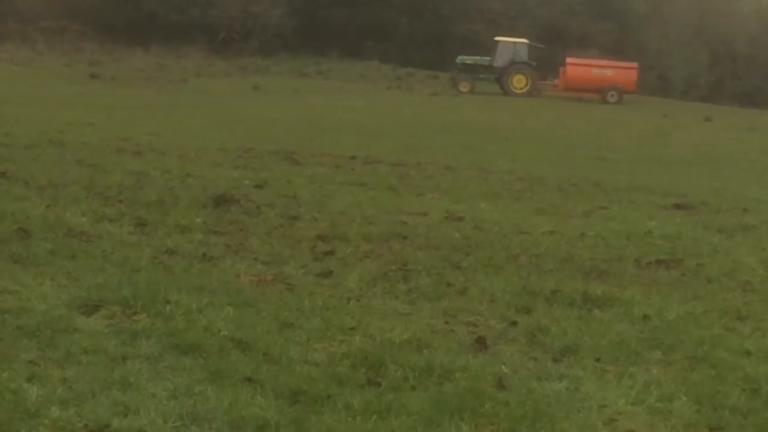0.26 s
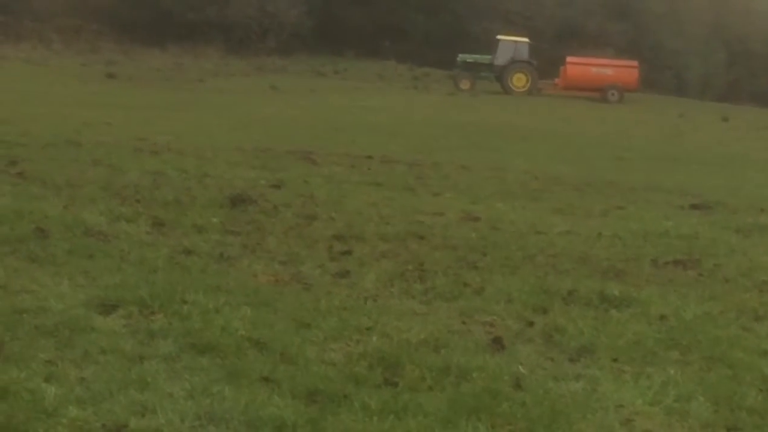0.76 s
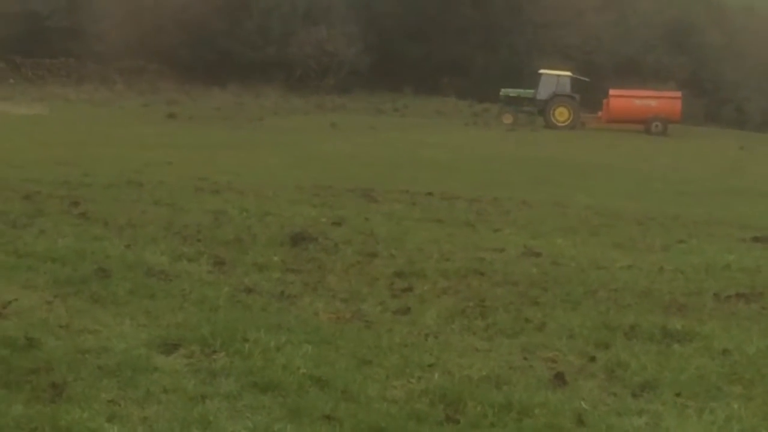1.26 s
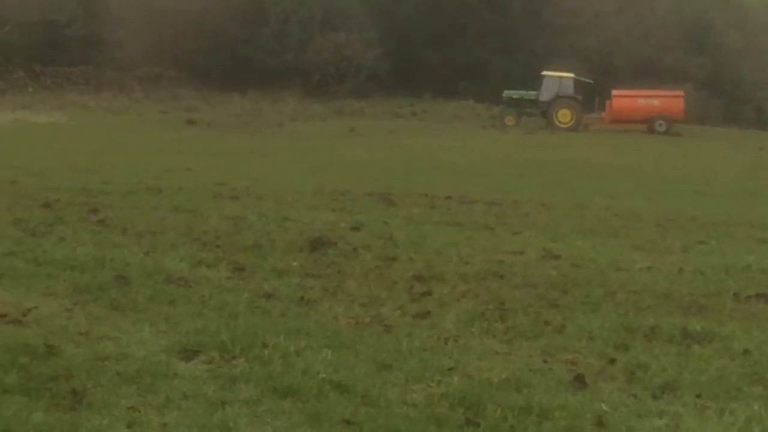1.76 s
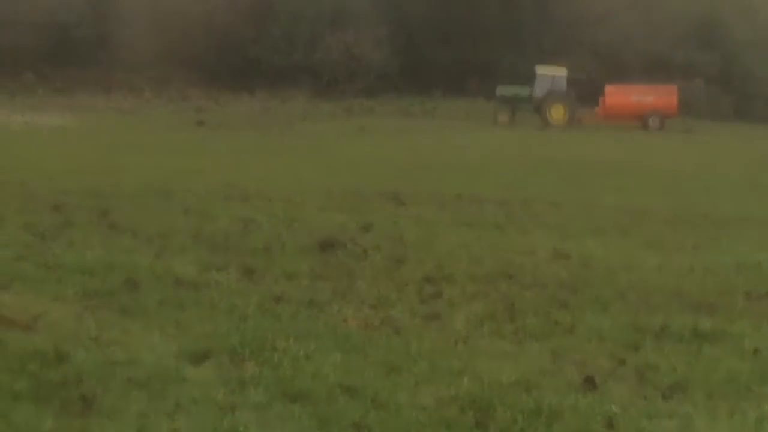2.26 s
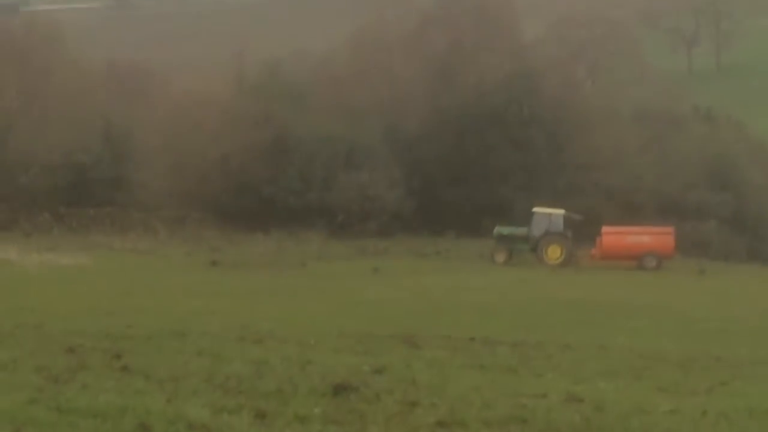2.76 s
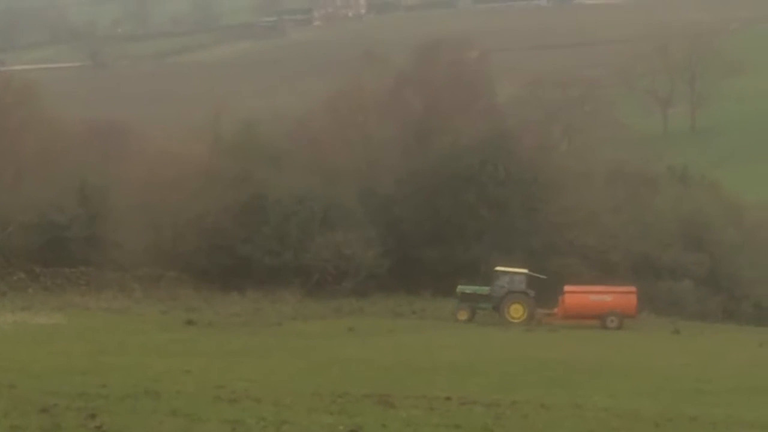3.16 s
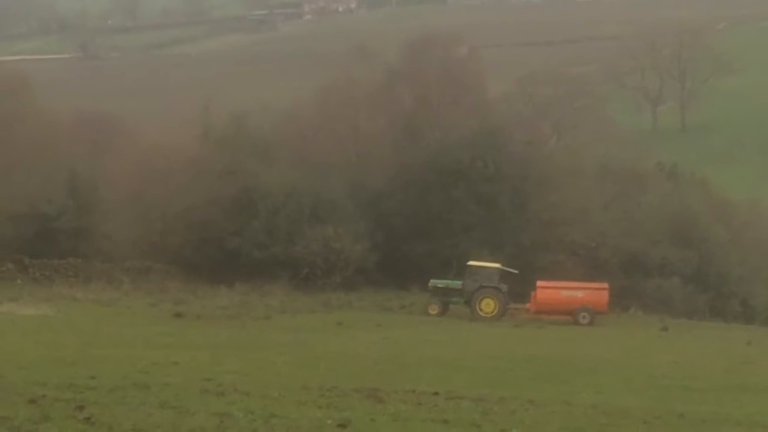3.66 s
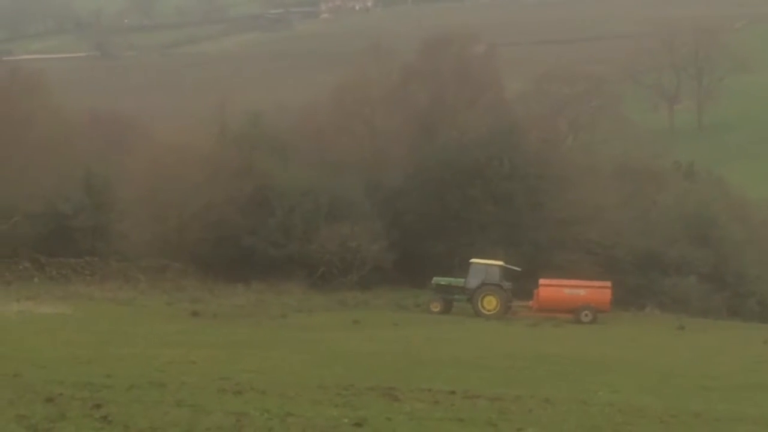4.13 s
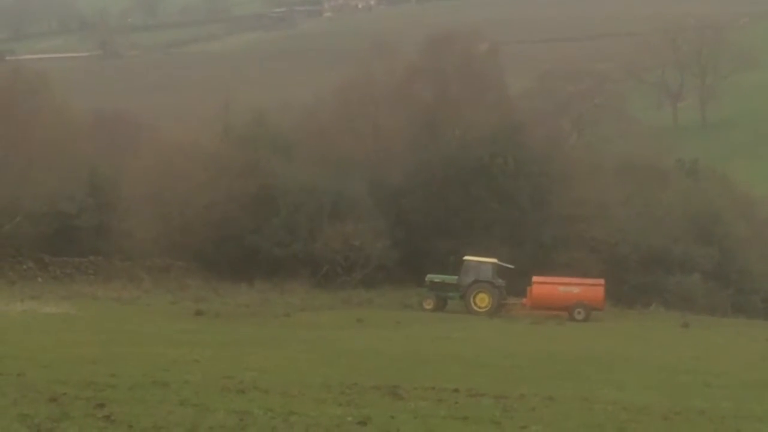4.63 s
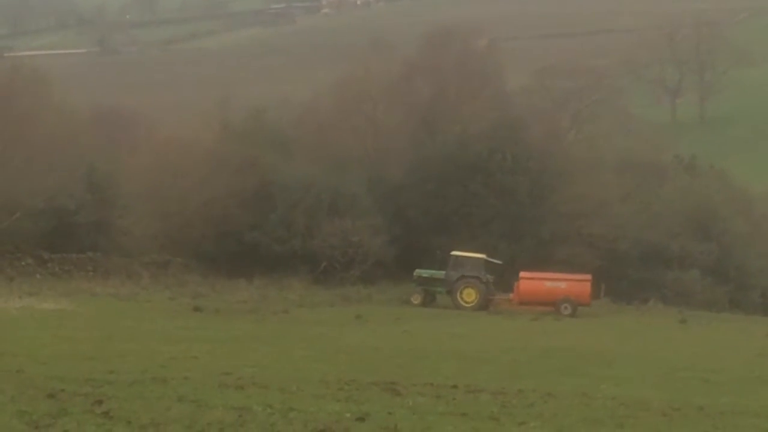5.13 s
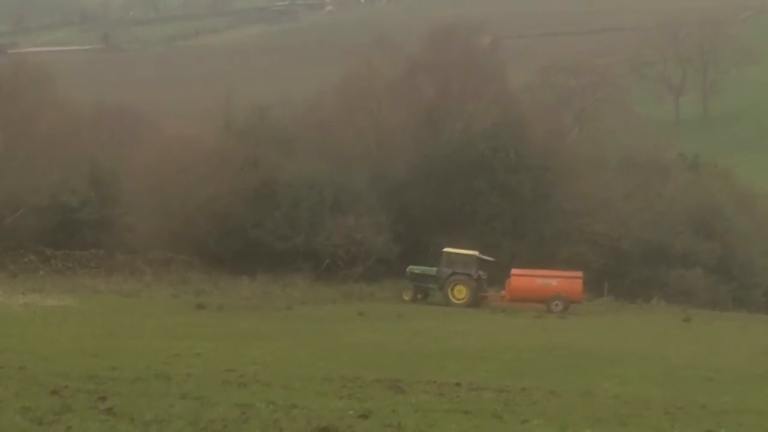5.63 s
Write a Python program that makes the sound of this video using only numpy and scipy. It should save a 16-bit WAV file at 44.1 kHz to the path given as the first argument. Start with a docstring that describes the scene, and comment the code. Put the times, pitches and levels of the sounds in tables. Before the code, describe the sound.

Across an open field, a tractor engine drones under load with a low boom and a diesel rattle. A pulsing hiss and occasional light ticks come from the spreader it is towing. After about two thirds of the time the driver lifts off, the pitch falls and the hiss fades back. A quick cluster of metallic clanks follows from the hitch, over a softer, knocking idle.

```python
"""A booming, knocking four-cylinder diesel tractor tows a muck spreader across a far hillside.
Near 4 s the driver lifts off, the revs sink, then the hitch clanks. The exhaust booms at the firing
rate, combustion knocks in the block, injectors tick, the spreader hums and hisses, chain and stones
hit its drum. The spectra are weak at 400-800 Hz, which soft ground swallows on the way."""
import sys
import numpy as np
from scipy import signal
from scipy.fft import rfft, irfft, next_fast_len
from scipy.io import wavfile
from scipy.ndimage import uniform_filter1d, map_coordinates

SR = 44100
rng = np.random.default_rng(int(sys.argv[2]) if len(sys.argv) > 2 else 0)


def generate_wav(sig):
    """Save sig (samples, or channels by samples) to the path in sys.argv[1] as 16-bit PCM at SR."""
    pcm = np.round(np.clip(np.atleast_2d(sig).T, -1, 1) * 32767).astype(np.int16)
    wavfile.write(sys.argv[1], SR, pcm)


N = 259749

# cylinders in firing order: knock/dB, injector/dB
CYLINDER_DB = [(1.9, -9), (2.4, -9), (-1, -12), (1.2, -6.5)]


def exhaust(firings, load):
    """Boom and overtones locked to the crank; uneven cylinders give the quarter orders."""
    # firing tone: t/s, level/dB
    boom_db = [(0, -37), (.64, -36.2), (1.3, -39), (2.2, -41), (3.5, -39.5), (3.9, -38.5), (3.99, -41),
               (4.07, -66), (4.3, -56), (4.7, -52), (5.89, -52)]
    # overtones: f/firing rate
    orders = [1.25, 1.75, 2, 2.25, 2.5, 2.75, 3, 3.25, 3.75, 4, 4.25, 4.75]
    # level per order: full load/dB, half load/dB, no load/dB
    orders_db = [(-61, -56, -79), (-62, -65, -67), (-50.5, -50, -50.5), (-63, -54, -56.5),
                 (-54.5, -80, -69), (-47, -67, -73), (-48, -43.5, -52.5), (-57, -71, -94),
                 (-90, -56, -57.5), (-57.5, -50, -60.5), (-60, -82, -57.5), (-65, -54, -73)]
    lag_turns = 0.22
    tones = amp(curves(boom_db)[0] + 0.18 * wobble(5.94)) * np.cos(2 * np.pi * firings)
    for order, db in zip(orders, orders_db):
        waver_db = 1.4 * wobble(6) + 0.9 * wobble(2.2)
        turns = order * firings + lag_turns + 0.073 * wobble(2.495)
        tones += amp(by_load(load, db[::-1]) + waver_db) * np.cos(2 * np.pi * turns)
    return np.sqrt(2) * tones


def knock(firings, load):
    """Each combustion shakes the block: a noisy rattle, plus a repeatable ring under load."""
    # rattle under load: f/Hz, density/dB
    loaded_spectrum = [(250, -39), (420, -19.5), (475, -20), (819, -14), (1010, -4.5), (1120, -7.5),
                       (1370, 1.5), (1800, -1.5), (2130, 0.5), (2780, -3), (3080, -10.5), (3800, -8),
                       (6000, -26), (7800, -46), (13200, -120)]
    # rattle off load: f/Hz, density/dB
    idle_spectrum = [(250, -46), (420, -30), (475, -15.5), (733, -13), (1140, -2), (1260, 0.5), (1910, 2),
                     (2280, -2.5), (3760, -6), (5430, -16), (6000, -43), (7800, -56), (13200, -120)]
    # block modes: f/Hz, width/Hz, level/dB
    modes = [(1035, 99, -1), (1301, 158, 5.5), (1394, 71, 6), (2115, 123, 3.5)]
    cylinder_db = [c[0] for c in CYLINDER_DB]
    fuelled = np.clip(2 * load - 1, 0, 1)
    steady = 0.42 + 0.62 * (1 - fuelled)  # bursts sink into this on low fuel
    shake = steady + bursts(firings, cylinder_db, start=0.075, rise=0.29, scatter_db=0.8)
    shake *= patchy(0.56)
    blend = np.sqrt(fuelled)
    rattle = blend * coloured(shake, loaded_spectrum) + (1 - blend) * coloured(shake, idle_spectrum)
    onsets = np.flatnonzero(np.diff(np.floor(firings - 0.2))) + 1
    blow_db = np.take(cylinder_db, firings[onsets].astype(int) % 4)
    blows = np.zeros(N)
    blows[onsets] = amp(blow_db + 0.55 * rng.standard_normal(len(onsets)))
    block = lambda f: sum(amp(db) * (1j * f * width / (hz * hz - f * f + 1j * f * width)) ** 2
                          for hz, width, db in modes)
    ring = amp(-7.5 + 1.5 * wobble(3)) * fuelled * unit(filtered(blows, block))
    return amp(by_load(load, (-53, -51.5, -41))) * (rattle + ring)


def drone(load):
    """Unsteady low roar of exhaust flow, tyres and bodywork."""
    # roar: f/Hz, density/dB
    spectrum = [(15, -32), (25, -30), (46, -6.5), (76, -5.5), (92, -5), (120, -3), (175, 1.5), (206, 0),
                (253, -7), (298, -6.5), (370, -13), (471, -27.5), (850, -25.5), (1100, -62)]
    level_db = by_load(load, (-52.5, -49, -45.5)) + 0.96 * wobble(9)
    return amp(level_db) * coloured(patchy(0.5), spectrum)


def injectors(firings, load):
    """A short bright tick just ahead of each combustion, over steady noise."""
    # injector noise: f/Hz, density/dB
    spectrum = [(4000, -12), (6000, -0.5), (7200, 2), (7800, 1), (8500, -1.5), (10000, -10.5),
                (12000, -15.5), (15200, -38)]
    swell = 1.36 + bursts(firings, [c[1] for c in CYLINDER_DB], start=0.076, rise=0.052, scatter_db=3)
    return amp(by_load(load, (-69.5, -65.5, -59))) * coloured(swell * rng.standard_normal(N), spectrum)


def spreader_hum(firings, load):
    """Drive geared just under exhaust order 2; beats with it, at 3 Hz before the revs sink."""
    gear_order = 2 - 0.0432
    level_db = -69 + 20 * np.clip(2 * load, 0, 1) + wobble(2.862)
    return np.sqrt(2) * amp(level_db) * np.cos(2 * np.pi * (gear_order * firings + 0.84))


def spreader_hiss(firings, load):
    """Rush of air and flung muck, pulsing with the engine."""
    # rush: f/Hz, density/dB
    spectrum = [(1470, -38), (2500, -7), (2780, -0.5), (3040, -4), (3960, -2), (5230, -8.5), (7970, -17.5),
                (13400, -31), (15100, -46)]
    swell = 0.47 + bursts(firings, [c[0] for c in CYLINDER_DB], start=0.12, rise=0.25, scatter_db=3.5)
    return amp(by_load(load, (-61, -63.5, -51))) * coloured(swell * patchy(1.6), spectrum)


def hitch_clanks():
    """Hitch slack: each contact rings the drawbar; long contacts ring on."""
    # contacts: t/s, relative level/dB, lowest-mode gain/dB, sustain/0-1
    contacts = [(4.875, -33, -20, 0.33), (5.034, -22.5, -8, 0.23), (5.062, -32, -15, 0.4),
                (5.134, -29, -14, .5), (5.151, -32.5, 4, 0.7), (5.21, -33, -13, 0.47), (5.3, -39, 1, 0.55)]
    # drawbar modes: f/Hz, level/dB, base t60/s
    modes = [(1001, -3, 0.18), (1246, -3, 0.05), (1362, -2, 0.096), (1626, -6, 0.15), (1890, -3, 0.13),
             (2030, 0.5, 0.072), (2540, -10, 0.055), (3240, -4, 0.047), (4470, -6, 0.024)]
    out, t = np.zeros(N + SR), np.arange(SR // 3) / SR
    attack = 1 - np.exp(-t / 0.00054)
    for start_s, contact_db, deep_db, sustain in contacts:
        ring = np.zeros(len(t))
        for hz, mode_db, t60_s in modes:
            level_db = mode_db + (hz < 1100) * deep_db + rng.normal(0, 0.99)
            decay_db = 60 * t / (t60_s * (0.61 + sustain))
            drift_turns = 0.0018 * np.cumsum(rng.standard_normal(len(t)))
            ring += amp(level_db - decay_db) * np.sin(2 * np.pi * (hz * t + drift_turns))
        out[round(start_s * SR):][:len(t)] += amp(contact_db - 17.5) * ring * attack
    return out[:N]


def drum_ticks():
    """Chain and stones hit the drum: a snap of band noise over a thud."""
    # hits: t/s, peak/dB, centre/Hz
    hits = [(0.3192, -29.5, 4070), (.6968, -31, 2290), (0.8676, -38, 2417), (1.165, -27, 2090),
            (1.5544, -32, 2985), (1.7903, -31, 3450), (3.2394, -41, 4514), (3.7824, -31, 4640),
            (3.9889, -42, 5453), (4.286, -39.5, 3286), (4.791, -51, 5006), (5.124, -39.5, 4230)]
    thud_hz, thud_db = (1310, 2940), -2
    out, t = np.zeros(N + SR), np.arange(SR // 40) / SR
    envelope = amp(-60 * t / 0.022) * (1 - np.exp(-t / 0.0005))

    def burst(band_hz):
        bandpass = signal.butter(3, band_hz, "bandpass", fs=SR, output="sos")
        return unit(signal.sosfilt(bandpass, rng.standard_normal(len(t)) * envelope))

    for start_s, peak_db, hz in hits:
        tick = burst([0.86 * hz, 1.14 * hz]) + amp(thud_db) * burst(thud_hz)
        out[round(start_s * SR):][:len(t)] += amp(peak_db) * tick / np.abs(tick).max()
    return out[:N]


def fizz():
    """Thin fizz near 5 kHz; swells, then sags, independent of the revs."""
    # fizz: f/Hz, density/dB
    spectrum = [(3800, -23), (4800, -7), (5500, -6), (6000, -9), (6600, -44)]
    start_s, rise_s, sag_db_per_s = 2, 0.54, 1.5
    sag_db = sag_db_per_s * np.maximum(np.arange(N) / SR - start_s - rise_s, 0)
    return amp(-64 + 4 * ramp(start_s, rise_s) - sag_db) * coloured(patchy(3), spectrum)


def air():
    """Faint steady hiss of air."""
    # noise floor: f/Hz, density/dB
    spectrum = [(3240, -24), (5500, 2), (6380, -18), (7620, -4), (15100, -10)]
    return amp(-79.5) * coloured(rng.standard_normal(N), spectrum)


def amp(db):
    """dB to gain."""
    return 10 ** (np.asarray(db) / 20)


def unit(x):
    """Scale to rms 1."""
    return x / np.sqrt(np.mean(x ** 2) + 1e-20)


def curves(rows):
    """One per-sample curve for each column after t/s."""
    times_s, *columns = np.transpose(rows)
    return [np.interp(np.arange(N) / SR, times_s, c) for c in columns]


def ramp(start_s, length_s):
    """Linear rise, 0 to 1."""
    return np.clip((np.arange(N) / SR - start_s) / length_s, 0, 1)


def by_load(load, db):
    """Interpolate levels given at no, half and full load."""
    return np.interp(load, [0, 0.5, 1], db)


def wobble(knots_per_s):
    """Smooth random curve."""
    knots = rng.standard_normal(int(N * knots_per_s / SR) + 4)
    return map_coordinates(knots, [np.arange(N) * knots_per_s / SR])


def filtered(x, response):
    """Apply a complex response of f/Hz."""
    size = next_fast_len(N + SR // 2)
    return irfft(rfft(x, size) * response(np.fft.rfftfreq(size, 1 / SR)), size)[..., :N]


def coloured(x, spectrum):
    """Shape by (f/Hz, density/dB) points on a log axis; rms 1."""
    f, db = np.transpose(spectrum)
    return unit(filtered(x, lambda hz: amp(np.interp(np.log(hz + 1), np.log(f + 1), db, -120, -120))))


def patchy(depth_db):
    """White noise with random gain patches in time and frequency."""
    bins = signal.stft(rng.standard_normal(N + 512), nperseg=512)[2]
    patches = uniform_filter1d(uniform_filter1d(rng.standard_normal(bins.shape), 6, 0), 10, 1)
    return signal.istft(bins * amp(depth_db * unit(patches)), nperseg=512)[1][:N]


def bursts(firings, cylinder_db, start, rise, scatter_db):
    """One swell per firing, sized by cylinder, some harder; start and rise in firings."""
    position = firings - start + 4
    index = position.astype(int)
    excess = np.minimum(rng.exponential(size=index[-1] + 1), 2.6)
    size = amp(np.asarray(cylinder_db)[index % 4] + scatter_db * excess[index])
    age = (position - index) / rise
    return unit(size * age * np.exp(1 - age))


def scene():
    """Engine and spreader follow crank and fuelling; clanks and ticks are timed."""
    # engine speed: t/s, firing rate/Hz
    revs = [(0, 69.48), (.5, 69.2), (.85, 70.16), (1.15, 69.9), (1.45, 69.23), (2.0, 69.5), (2.35, 69.95),
            (2.75, 69.55), (3.2, 70.07), (3.55, 69.3), (3.84, 68.6), (3.98, 65.97), (4.1, 60.9),
            (4.26, 54.93), (4.44, 49.8), (4.7, 46.2), (4.9, 48.31), (5.89, 48.1)]
    # fuelling: t/s, load/0-1
    fuelling = [(0, 0.96), (3.9, 0.99), (4.02, 0.7), (4.13, 0.55), (4.22, 0.21), (4.4, 0.13), (4.6, 0.01),
                (5.89, 0.02)]
    # slow swell as sound carries over the field: t/s, mid/dB, treble/dB
    carry = [(0, 0.5, -0.5), (.6, -1, 0.5), (1.3, 1, 1), (1.72, 1, 4.5), (2.1, -0.5, 0.5), (2.45, -1, 0.5),
             (3.2, 0.64, -2.5), (3.8, -1.5, -5), (4.1, 0, 0), (5.3, -1, 1), (5.65, -3.5, 1), (5.89, -3, 6)]
    firings = np.cumsum(curves(revs)[0]) / SR
    load = curves(fuelling)[0]
    mid_db, treble_db = curves(carry)
    dull_db = -11.5 * ramp(4.79, 0.04)  # treble drops and stays down
    low = exhaust(firings, load) + spreader_hum(firings, load) + drone(load)
    high = (amp(mid_db) * knock(firings, load)
            + amp(1.6 * mid_db) * spreader_hiss(firings, load)
            + amp(dull_db) * fizz()
            + amp(treble_db + dull_db) * injectors(firings, load))
    return (low + high + hitch_clanks() + drum_ticks() + air())[None]


def record(dry):
    """Brick-wall low-pass."""
    cutoff_hz = 15250
    return filtered(dry, lambda hz: hz < cutoff_hz)


dry = scene()
out = record(dry)
generate_wav(out)
```